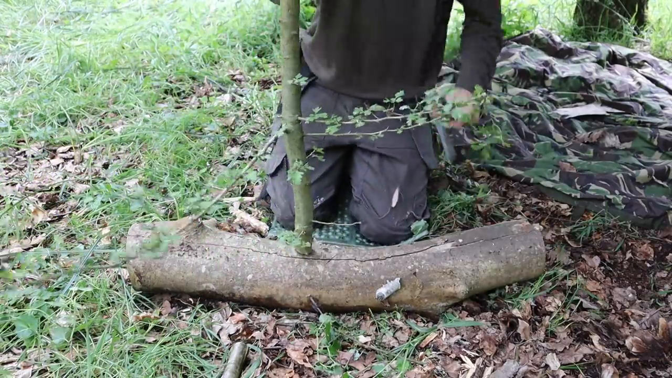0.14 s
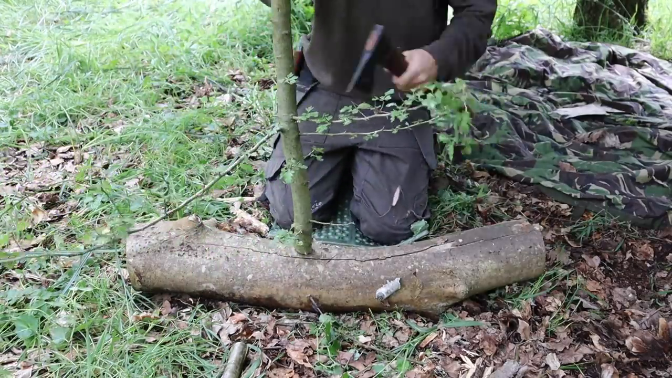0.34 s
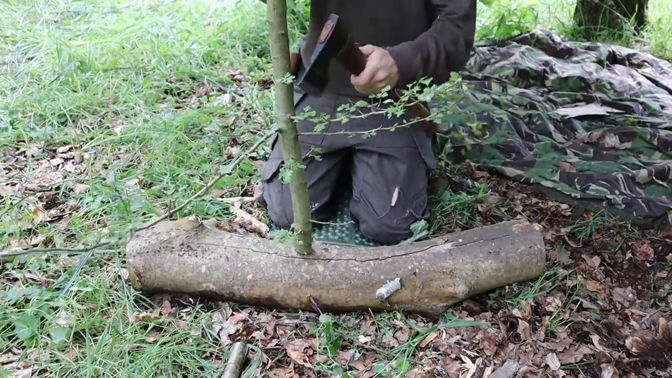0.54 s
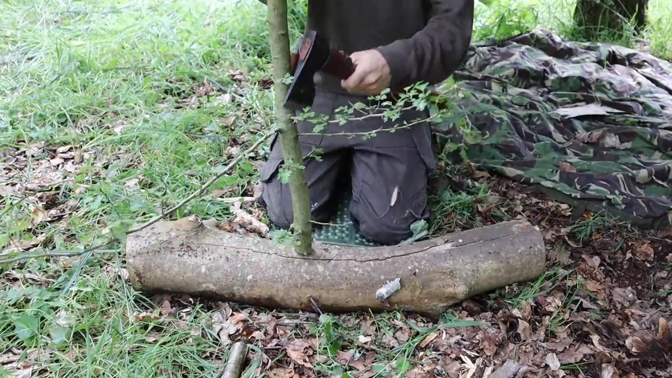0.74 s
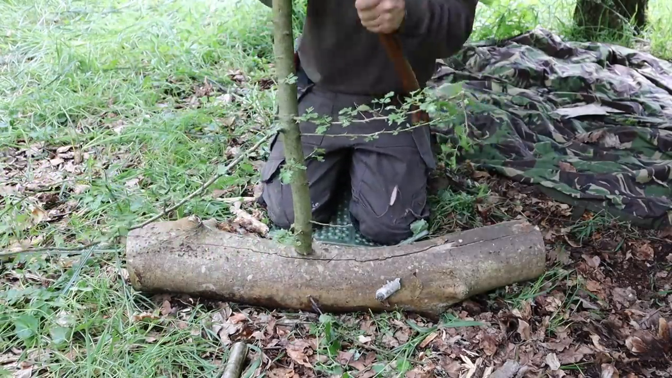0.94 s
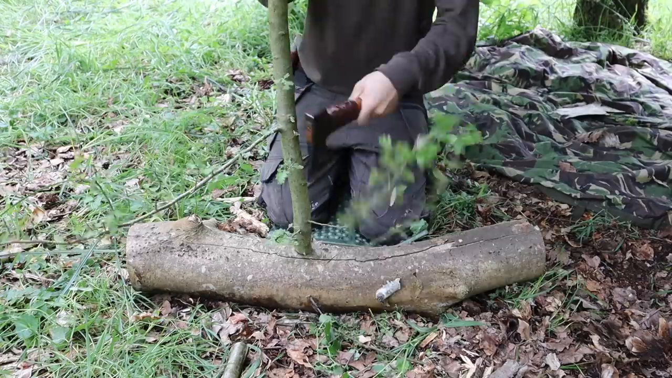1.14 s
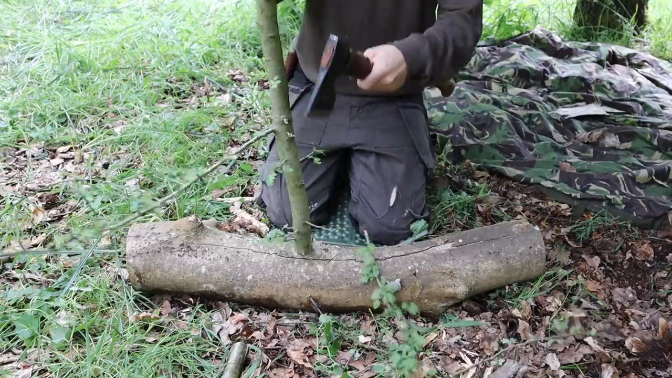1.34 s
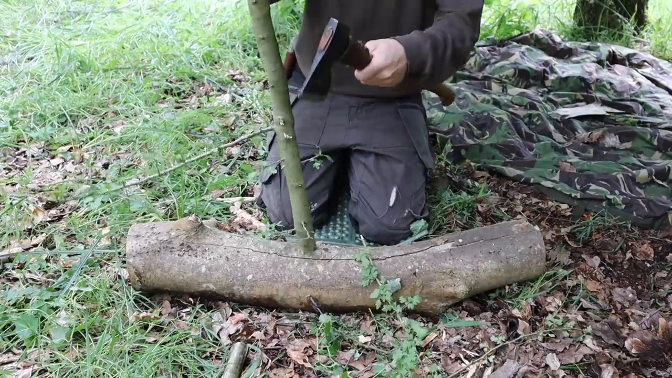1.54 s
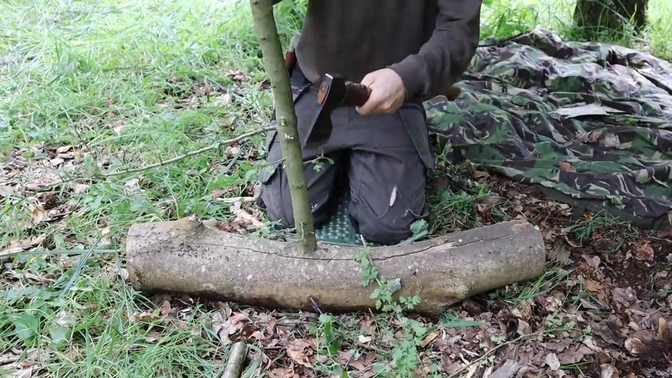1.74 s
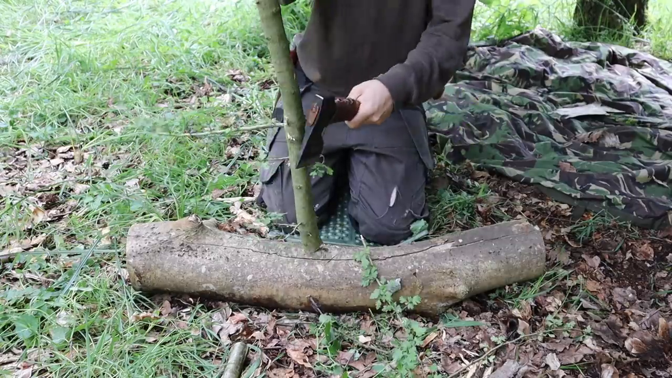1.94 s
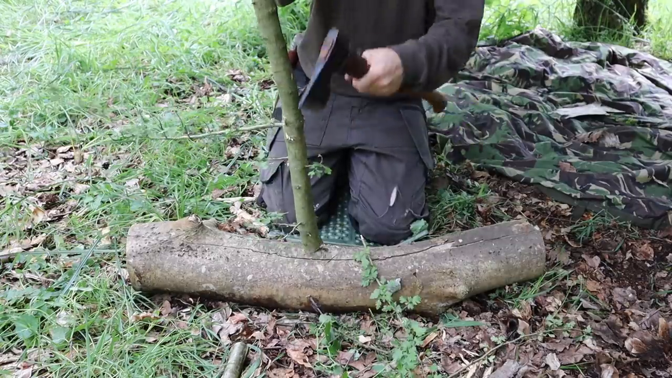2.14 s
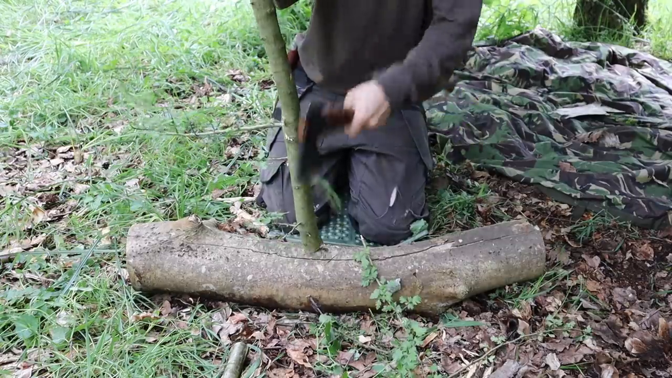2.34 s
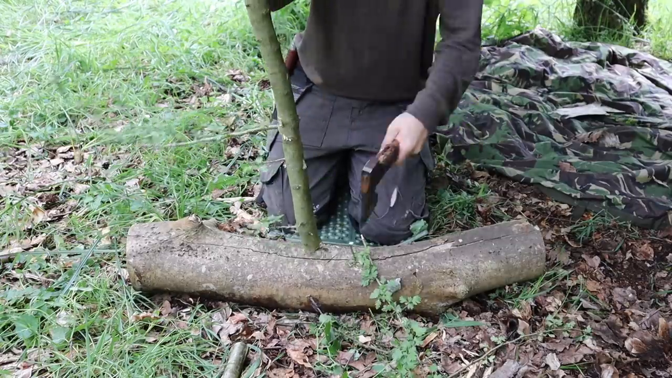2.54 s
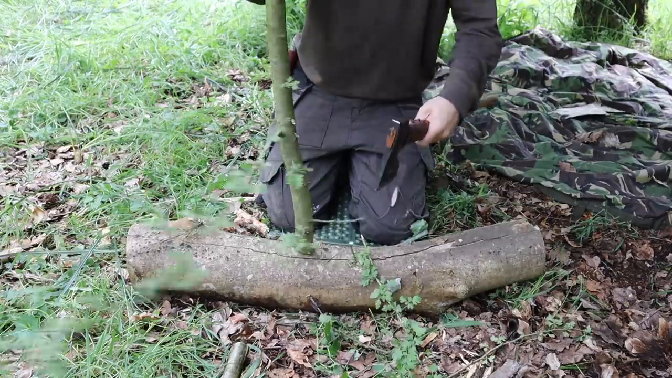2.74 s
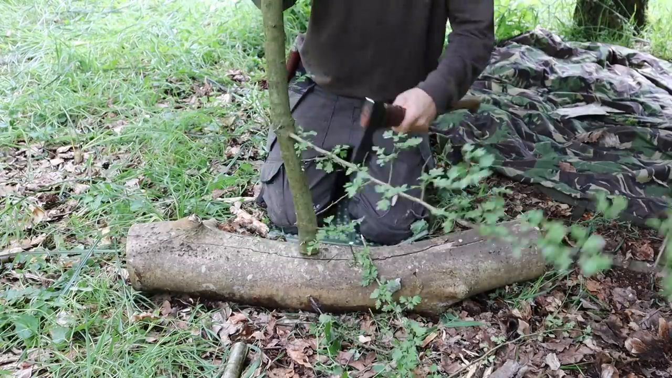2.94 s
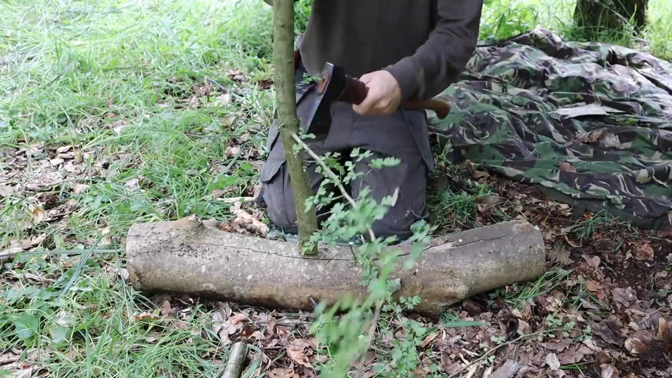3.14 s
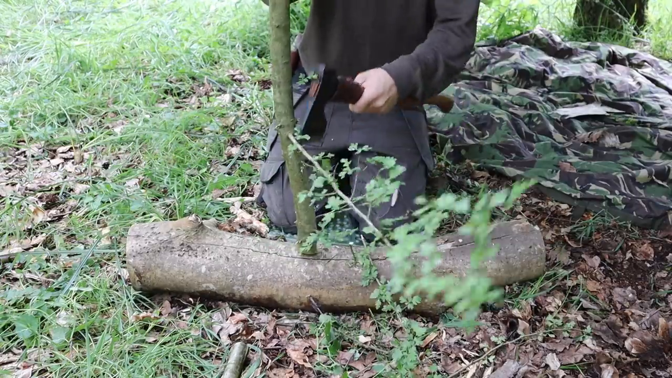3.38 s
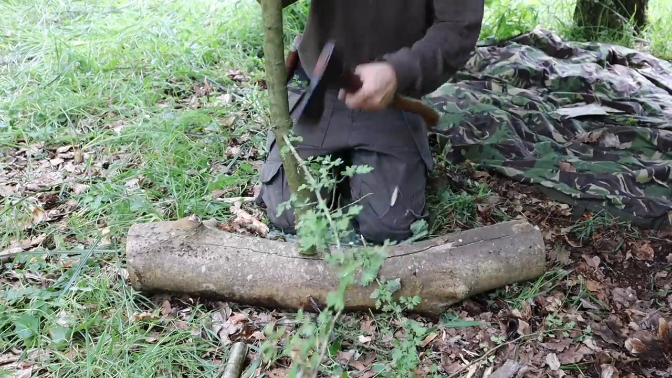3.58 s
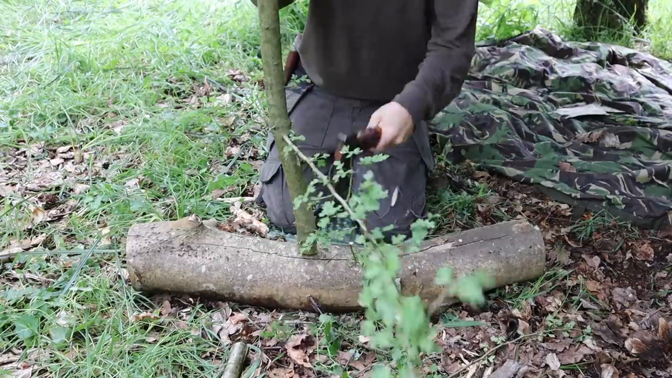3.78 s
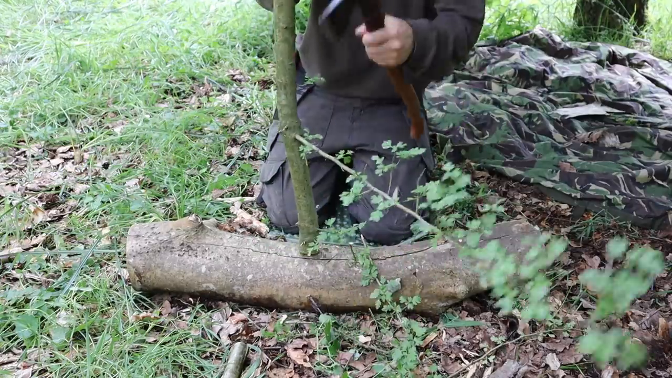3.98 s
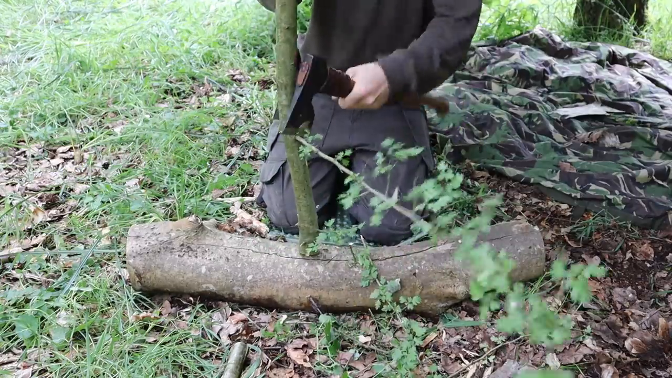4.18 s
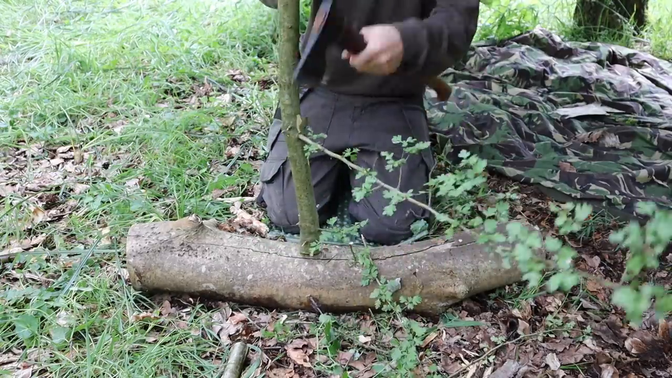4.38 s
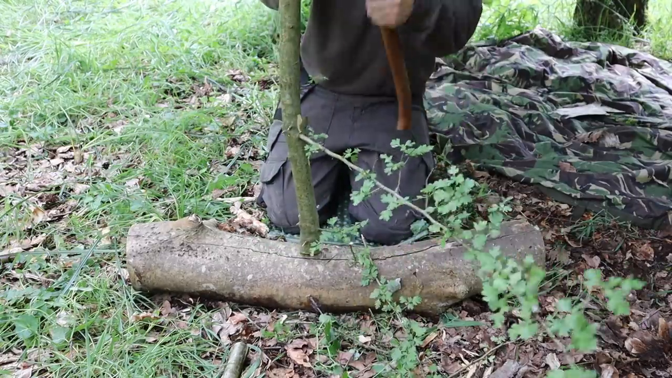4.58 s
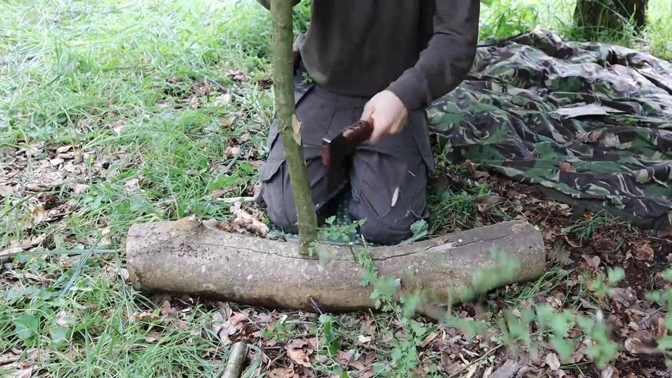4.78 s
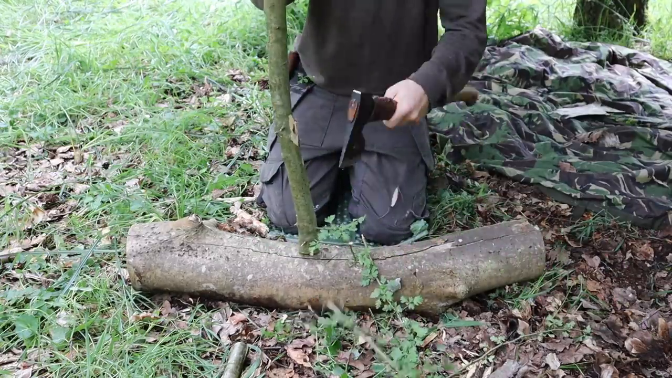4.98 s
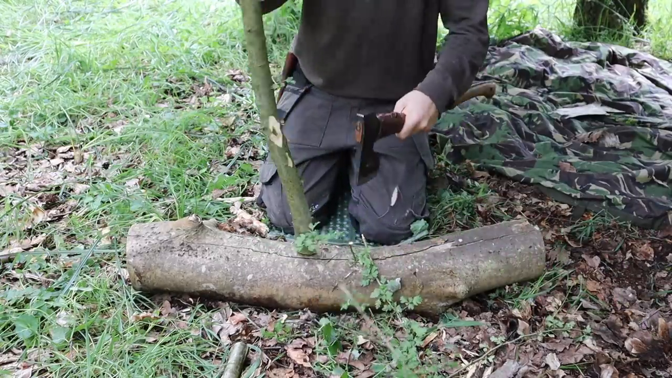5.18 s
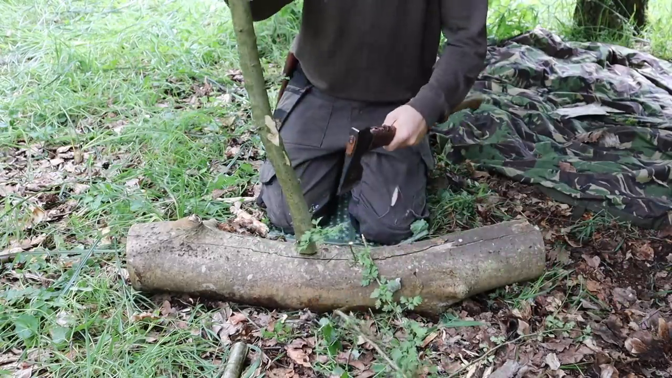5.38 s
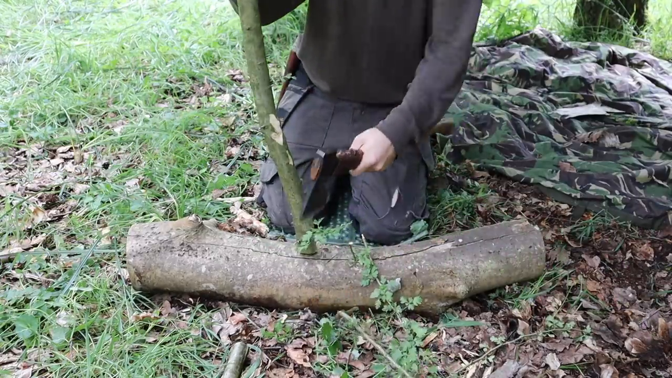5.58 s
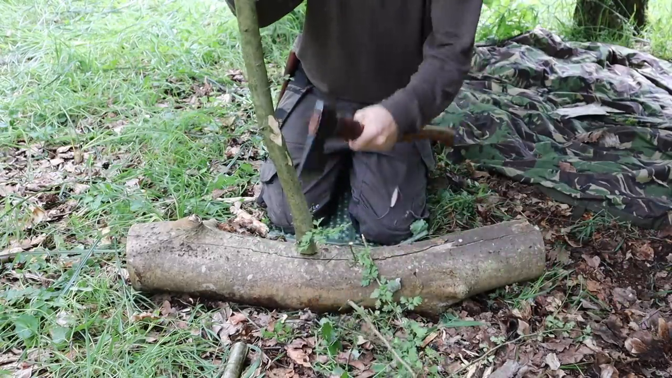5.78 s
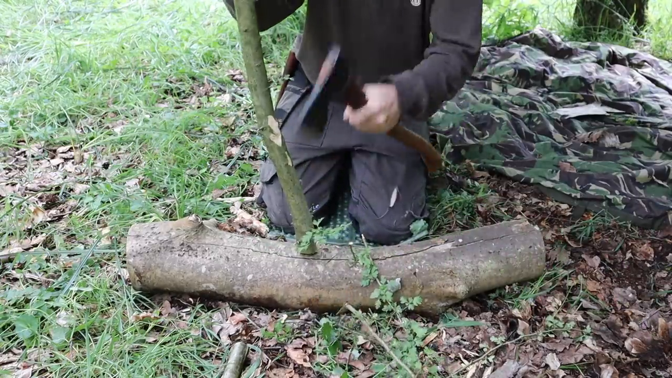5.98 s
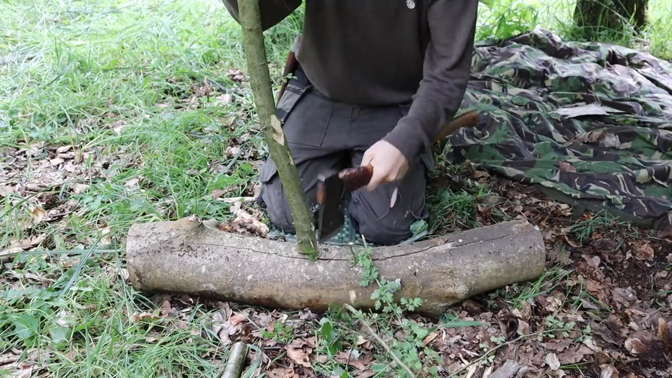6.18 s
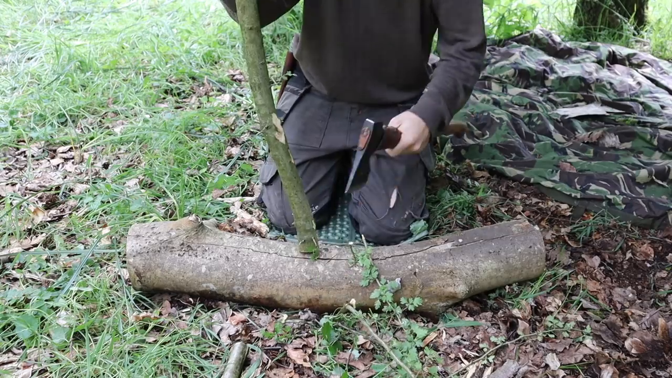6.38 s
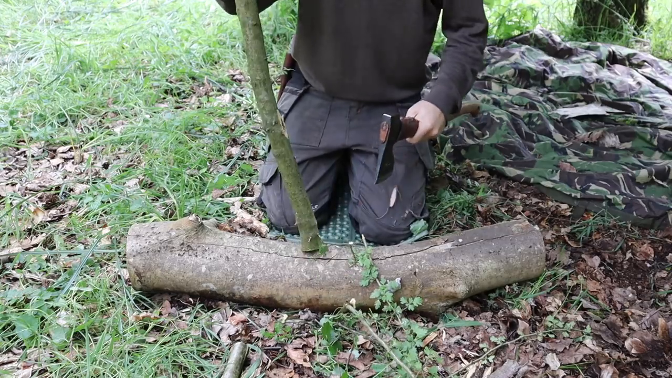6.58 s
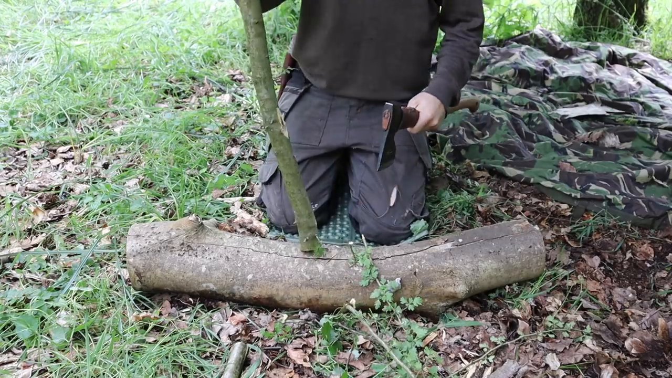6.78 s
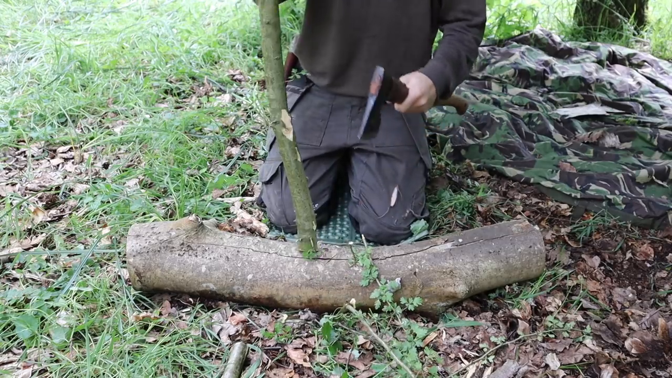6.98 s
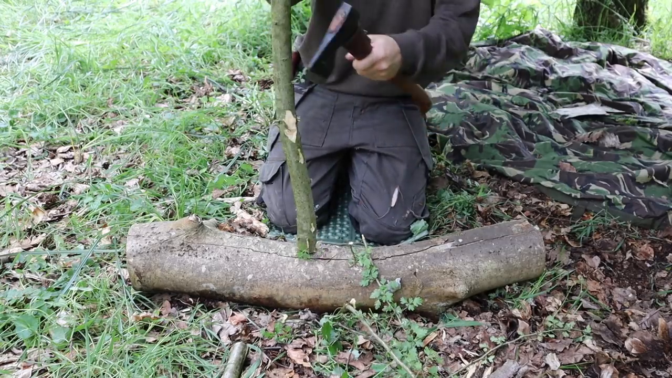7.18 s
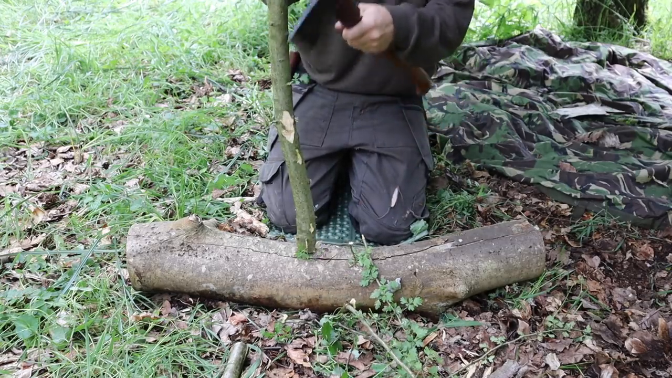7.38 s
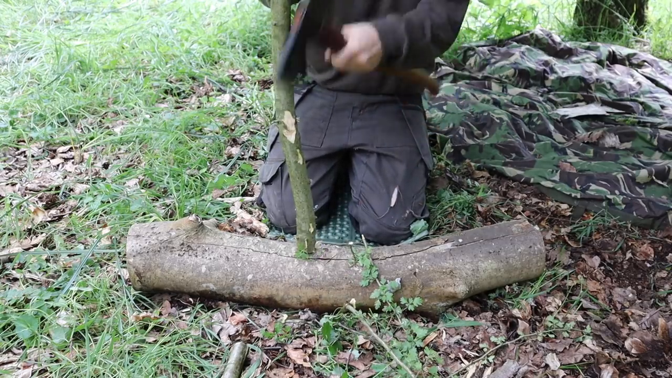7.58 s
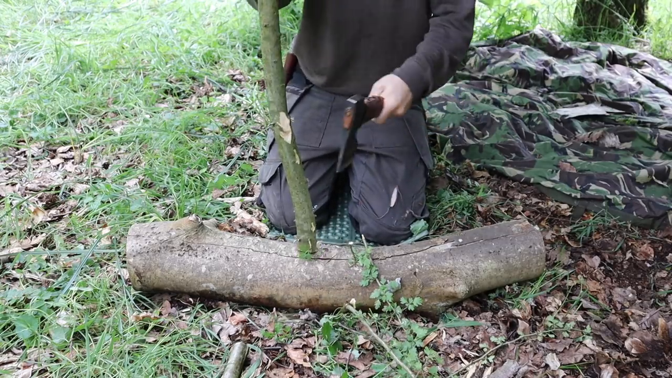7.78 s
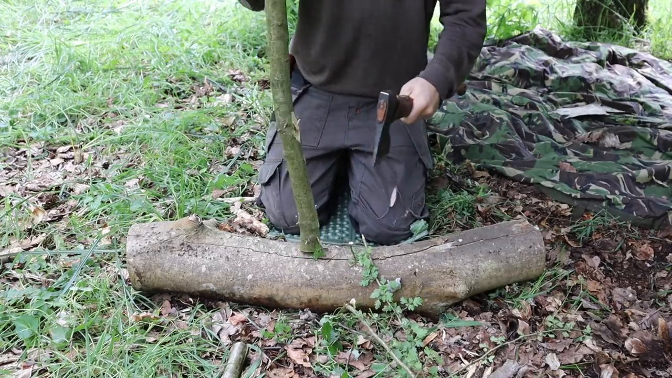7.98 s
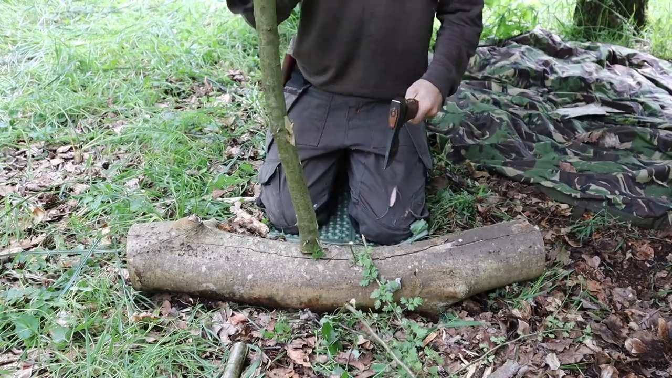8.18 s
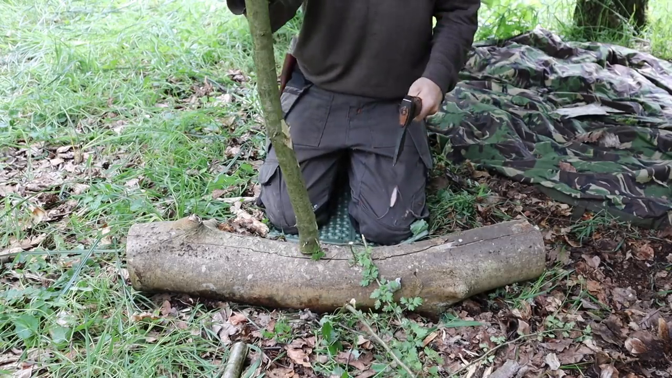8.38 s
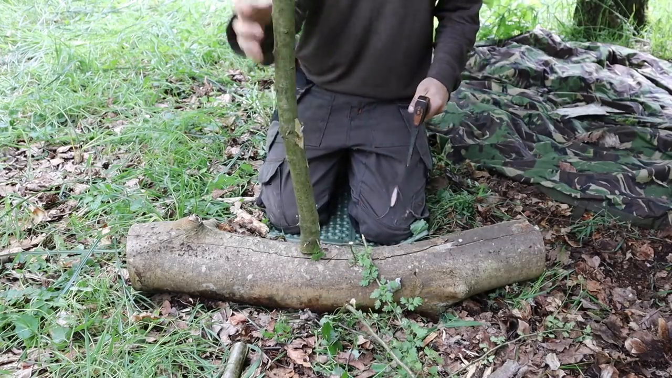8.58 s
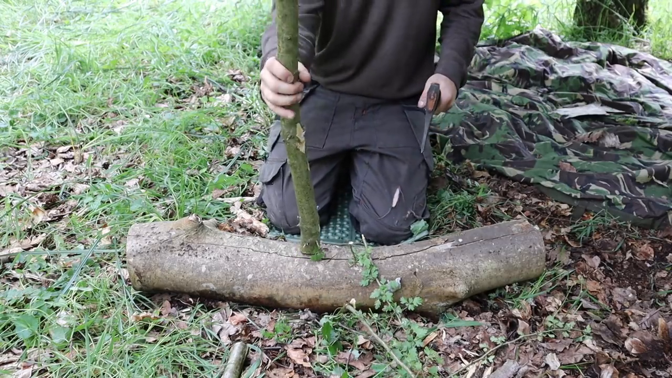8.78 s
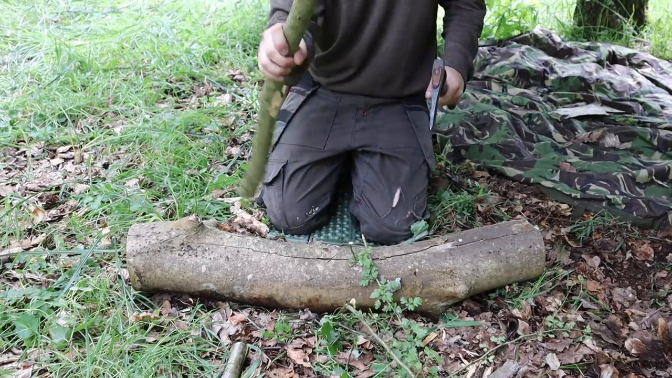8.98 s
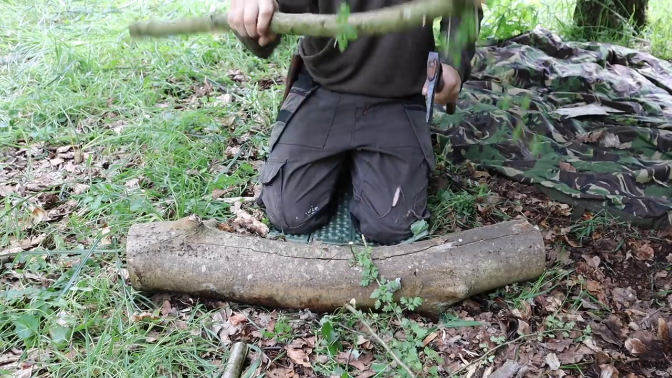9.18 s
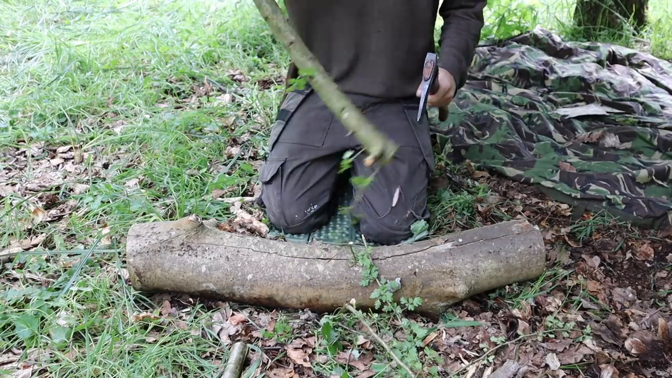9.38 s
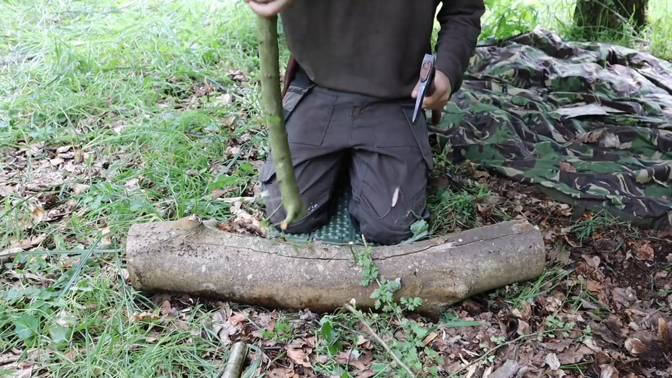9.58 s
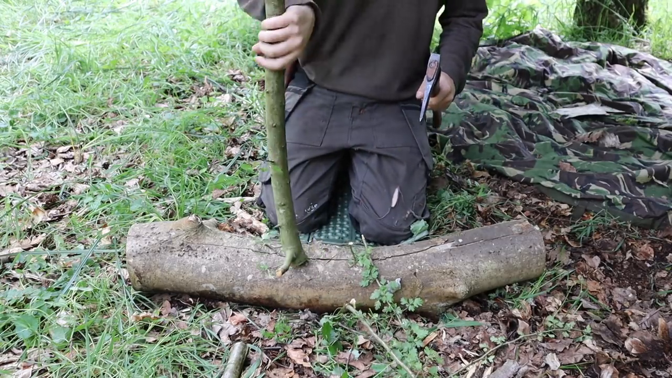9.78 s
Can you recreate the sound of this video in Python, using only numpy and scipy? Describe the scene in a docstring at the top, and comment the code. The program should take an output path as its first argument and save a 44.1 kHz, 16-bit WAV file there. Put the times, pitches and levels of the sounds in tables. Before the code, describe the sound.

A small hatchet scuffs off the ground at the start, close to the microphone in woodland. Two light cuts at 0.7 and 0.9 seconds lead to a hard double crack at 1.1. More chops land on the green stick at about 2.4, 3.3, 3.7, 4.2, 4.7, 6.1 and 7.7 seconds, with faint nicks near 2 and 5.7; the one at 6.1 is the heaviest. Each gives a splintering crack, a woody knock and a brief high steel ping, and several jolt the stick against the log beneath. Between blows, cut twigs tick, swish and rustle, notably around 1.4 and 4.9 seconds. A faint low hum passes near 8 seconds. Small ticks follow, and one sharp woody tap comes at 9.7. Throughout, gusty wind rumbles on the microphone, easing toward the end, over the steady soft hush of trees.

```python
"""A small hatchet scuffs off the ground in a wood, then lops twigs off a green stick standing on a log.
From 0.7 s, each blow knocks the stick, cracks its fibres and rings the steel head. Some jolt the stick
on the log, and cut twigs tick and rustle as they fall. A faint hum passes near 8 s, after the last blow,
and one last sharp woody tap sounds near the end. All along, wind rumbles on the close microphone over
the steady hush of the trees."""
import sys
import numpy as np
from scipy import signal
from scipy.fft import rfft, irfft, next_fast_len
from scipy.io import wavfile
from scipy.ndimage import uniform_filter1d, map_coordinates

SR = 44100
rng = np.random.default_rng(int(sys.argv[2]) if len(sys.argv) > 2 else 0)


def waveform_to_disk(signal):
    """Save audio, clipped to [-1, 1], as 16-bit WAV at the path in sys.argv[1]."""
    frames = np.transpose(np.atleast_2d(signal))
    scaled = np.clip(frames, -1, 1) * 32767
    samples = np.round(scaled).astype(np.int16)
    wavfile.write(sys.argv[1], SR, samples)


N = 433944

# Each row: bite time in seconds, seconds the edge touches before that, crack level in dB, tearing time
# in seconds, tilt (brightness) in dB per octave, splinter pitch in Hz, knock level in dB, ping level
# in dB, seconds the head rings freely, its lower tones' gain in dB.
BLOWS = [(0.727, 0.013, -19, 0.0014, -3, 5160, -46, -44, .013, -3),
         (.852, 0.0069, -12.5, 0.00098, 2.5, 13200, -52, -31.5, .05, 0),
         (1.1347, 0.00023, -3, .005, 0, 12500, -20, -14.5, 0.0087, 7),
         (1.147, 0.013, -2.5, 0.0049, -0.5, 3150, -49, -14.5, 0.057, -19),
         (1.998, 0.0039, -24, .002, -5, 5100, -50, -41, .02, -7),
         (2.412, 0.0048, 0.5, 0.0022, -1, 1530, -17.5, -21.5, .022, 0),
         (2.519, 0.0091, -24.5, 0.0012, 8.5, 5030, -55, -42, .015, -9),
         (3.3164, .0047, -8, 0.0013, 0.5, 3630, -37, -23.5, .044, 6.5),
         (3.685, 0.0078, 1.5, 0.0014, 3, 3800, -17, -20.5, .027, -12),
         (4.2415, 0.0032, -7.5, 0.013, 2, 5260, -20, -45, .011, -3),
         (4.7368, 0.0056, 3, 0.0045, 2.7, 2900, -29, -23, 0.056, 8),
         (5.702, 0.023, -17, 0.0018, -8.5, 5200, -39.5, -44, .033, -12),
         (6.1207, .0046, 6, 0.0017, -4.5, 5500, -9.5, -16, 0.019, 8),
         (7.6557, 0.0044, -6, 0.0038, 0, 5740, -18.5, -15, .085, -1.5)]
def chops():
    """The edge scores the bark and knocks the stick, then bites in with a louder crack."""
    track, t = np.zeros(N), np.arange(SR // 3) / SR
    for bite, lead, db, tearing, tilt_db, hz, knock_db, *_ in BLOWS:
        touch = bite - lead
        add(track, touch, crack(t, db - 19, lead, tilt_db, hz=3100))
        add(track, touch + 0.000746, knock(t, knock_db, knock_db, knock_db - 10))
        add(track, bite, crack(t, db, tearing, tilt_db, hz))
    return track


def crack(t, db, tearing, tilt_db, hz):
    """A sharp, woody crack from the stick; weaker ones die away more slowly."""
    fade = 0.0098 * amp(-0.31 * db)
    return snap(t, db, tearing, fade, tilt_db, hz, tail_db=-19.5, splinter_db=6)


# The tone of breaking fibres. Each row: frequency in Hz, relative level in dB.
FIBRE_TONE = [(700, -8.5), (1500, -1.5), (2800, 4), (4500, 1), (8000, -4), (12500, -8), (15000, -4.5),
              (16200, -38)]
def snap(t, db, tearing, fade, tilt_db, hz, tail_db, splinter_db):
    """Breaking fibres make rough noise that holds while wood tears, dies fast and rings a splinter."""
    roughness = amp(1.5 * unit(uniform_filter1d(rng.standard_normal(len(t)), size=30)))
    since_torn = np.maximum(t - tearing, 0)
    attack = 1 - np.exp(-t / (0.0001 + 0.079 * tearing))
    decay = amp(-60 * since_torn / fade) + amp(tail_db - 60 * since_torn / 0.11)
    burst = attack * decay * coloured(roughness * rng.standard_normal(len(t)), FIBRE_TONE, tilt_db)
    splinter = lambda f: 1 + amp(splinter_db) * .12j * f * hz / (hz * hz - f * f + .12j * f * hz)
    return amp(db - 9) * filtered(burst, splinter)


# The stick's low, high and middle tones. Each row: pitch in Hz, level in dB, seconds to fade by 60 dB.
THUD_TONES = [(168, 3, 0.0056), (291, -5, 0.029), (413, 0.5, .025)]
CLACK_TONES = [(910, -12, 0.066), (991, 6, 0.02), (1655, -1.5, 0.023), (2150, -0.5, 0.0077)]
STICK_TONES = [(569.5, 12.5, 0.075)]
def knock(t, thud_db, clack_db, stick_db):
    """The struck stick vibrates with a low thud, a high clack and a note in between."""
    thud = amp(thud_db) * ring(THUD_TONES, t, spread_db=1.3)
    clack = amp(clack_db) * ring(CLACK_TONES, t, spread_db=1.5)
    note = amp(stick_db) * ring(STICK_TONES, t, spread_db=0.85)
    return -(thud + clack + note)


# The head's top and lower tones. Each row: pitch in Hz, level in dB, seconds to fade by 60 dB.
TOP_STEEL_TONES = [(8394, 2.5, 0.082)]
LOWER_STEEL_TONES = [(6790, 1.5, 0.027), (2735, -8, 0.081)]
def steel_head():
    """The steel head pings at each blow and is soon damped."""
    track, t = np.zeros(N), np.arange(SR // 5) / SR
    for bite, *_, db, free, lower_db in BLOWS:
        damping = amp(-60 * np.maximum(t - free, 0) / 0.011) + amp(-16)  # a little rings on
        top = ring(TOP_STEEL_TONES, t, spread_db=0.79)
        lower = amp(lower_db) * ring(LOWER_STEEL_TONES, t, spread_db=1.0)
        add(track, bite + 0.001189, amp(db) * damping * (top + lower))
    return track


# Each row: start in seconds, level in dB, seconds before it fades, tilt in dB per octave, pitch in Hz.
CRACKS_AND_TAP = [(2.43, -21.5, .011, 5, 3970), (2.448, -10.5, 0.0026, -3, 2560),
                  (3.323, -11.5, 0.0013, -1, 3660), (6.1245, -8, 0.0053, 0.5, 2930),
                  (6.1365, -2, 0.0033, -4, 3770), (7.682, -17, .0047, 5, 4400),
                  (9.6947, -8, 0.0025, 5, 4630)]
def cracks_and_tap():
    """The wood cracks again just after some blows; the last row is a sharp tap on the stick's end."""
    track, t = np.zeros(N), np.arange(SR // 3) / SR
    for start, *settings in CRACKS_AND_TAP:
        add(track, start, crack(t, *settings))
    return track


# The log's tones. Each row: pitch in Hz, level in dB, seconds to fade by 60 dB.
LOG_TONES = [(517, 4, 0.12), (514, -19, 0.25)]
# Each row: start in seconds, then thud, clack and log levels in dB.
JOLTS = [(1.158, -31, -23, -27.5), (2.412, -24, -11, -20.5), (2.43, -29, -21.5, -40),
         (3.686, -17, -24, -31), (4.2435, -22, -10.5, -12.5), (4.2542, -5.5, -12.5, -14),
         (4.7362, -14.5, -4, -12), (4.943, -44, -31, -50), (5.7, -41, -49, -31.5), (6.133, -10, -11.5, -26),
         (6.1395, -10, -7.5, -4.5), (7.658, -24, -18, -27.5)]
def jolts():
    """The foot of the stick jolts on the log, and both ring."""
    track, t = np.zeros(N), np.arange(SR // 3) / SR
    for start, thud_db, clack_db, log_db in JOLTS:
        stick = knock(t, thud_db, clack_db, clack_db - 23)
        log = amp(log_db) * ring(LOG_TONES, t, spread_db=1.0)
        add(track, start, stick - log)
    return track


# Each row: start in seconds, level in dB, splinter pitch in Hz.
TWIG_TICKS = [(.013, -26, 2330), (0.083, -20, 2850), (.783, -36, 11000), (.797, -38, 11000),
              (.845, -23, 5100), (1.186, -25.5, 4000), (1.207, -15, 2430), (1.236, -16, 5450),
              (1.3874, -25, 8000), (1.411, -17.5, 5100), (1.415, -14.5, 3200), (2.456, -18.5, 5100),
              (2.539, -34, 12000), (3.746, -15.5, 10400), (3.765, -29, 3200), (3.7698, -30, 2800),
              (3.817, -33, 12500), (3.821, -32, 13000), (4.225, -22, 5230), (4.406, -25, 1590),
              (4.405, -32, 11000), (4.875, -44, 11100), (4.887, -41, 11000), (4.921, -36, 4000),
              (4.942, -9, 7150), (4.958, -34, 4470), (5.097, -33, 7000), (5.693, -27, 14500),
              (6.1946, -30, 4530), (6.198, -45, 12000), (7.826, -29.5, 7940), (7.84, -33, 6500),
              (7.893, -32.5, 10000), (8.455, -30, 5470), (9.474, -33, 4000), (9.535, -32, 6000),
              (9.546, -29, 5700), (9.624, -31, 11300), (9.818, -23, 5300), (9.827, -31, 6000)]
def twig_ticks():
    """Twigs and chips snap and land with tiny clicks."""
    track, t = np.zeros(N), np.arange(SR // 10) / SR
    for start, db, hz in TWIG_TICKS:
        tilt_db = -3 + 2 * np.log2(hz / 4000)  # thinner, higher splinters sound brighter
        add(track, start, snap(t, db, 0.0014, 0.0073, tilt_db, hz, tail_db=-13, splinter_db=10))
    return track


# Each row: time of the peak in seconds, level in dB, rise time in seconds.
TWIG_SWEEPS = [(.31, -48.5, .035), (1.25, -51, 0.042), (1.42, -32.5, 0.029), (2.8, -55, 0.069),
               (2.92, -53, 0.037), (3.5, -54.5, 0.054), (3.72, -49, .021), (4.33, -48, .1),
               (5.1, -44.5, 0.076), (5.48, -47.5, 0.061), (6.24, -53, .055)]
TWIG_SLAPS = [(2.555, -45, 0.0066), (3.781, -33, .0055), (4.223, -31, .0027), (4.944, -27.5, 0.012)]
GROUND_SCUFF = [(.083, -29, 0.0084), (.2, -38, 0.15)]
def brushing():
    """Leafy twigs sweep past and slap down; the hatchet drags off the ground with a duller scuff."""
    sweeps = swishes(TWIG_SWEEPS, fall_ratio=0.83, tilt_db=5.5)
    slaps = swishes(TWIG_SLAPS, fall_ratio=2.9, tilt_db=5.5)
    scuff = swishes(GROUND_SCUFF, fall_ratio=0.58, tilt_db=-10.5)
    return sweeps + slaps + scuff


# The tone of leaves. Each row: frequency in Hz, relative level in dB.
LEAF_TONE = [(800, -24.5), (3000, 5.5), (5500, 9), (9000, -4), (13000, -2), (16500, -16)]
def swishes(rows, fall_ratio, tilt_db):
    """Brushed leaves crackle in bursts that swell and fade."""
    track, t = np.zeros(N), np.arange(N) / SR
    leaves = crackle(click_gain=0.91) * amp(wobble(120))
    for peak, db, rise in rows:
        fall = fall_ratio * rise
        near = slice(max(round((peak - 3 * rise) * SR), 0), round((peak + 3 * fall) * SR))
        width = np.where(t[near] < peak, rise, fall)
        swell = np.exp(-((t[near] - peak) / width) ** 2)
        track[near] += amp(db) * swell * coloured(leaves[near], LEAF_TONE, tilt_db)
    return track


# Each row: time in seconds, rustle level in dB.
RUSTLE_LEVELS = [(0.0, -46), (0.41, -58.5), (1.18, -59), (1.34, -51.5), (1.75, -57), (2.33, -63),
                 (2.55, -54), (4.77, -64.5), (4.96, -48.5), (6.0, -63.5), (9.56, -63), (9.84, -51)]
def rustle():
    """Leaves brush together in a quiet, fluttering rustle."""
    flutter_db = 0.83 * wobble(25) + 3.94 * wobble(90)
    return amp(curves(RUSTLE_LEVELS)[0] + flutter_db) * coloured(crackle(click_gain=0.95), LEAF_TONE)


def crackle(click_gain):
    """Hiss with about 500 leaf clicks a second, uneven in size."""
    clicks = (rng.random(N) < 500 / SR) * amp(3.6 * rng.standard_normal(N))
    clicks *= np.sign(rng.standard_normal(N))
    return rng.standard_normal(N) + click_gain * unit(clicks)


def echo(sound):
    """The ground and the trees around give a short, dull answer."""
    t = np.arange(SR // 3) / SR
    tone = [(300, -1), (2800, -22.5), (6000, -7.5), (14000, -15)]  # Hz, dB
    tail = coloured(rng.standard_normal(len(t)), tone) * amp(-60 * t / 0.23)
    return signal.fftconvolve(sound, tail / np.linalg.norm(tail))[:N]


# Each row: time in seconds, deep rumble level in dB, upper rumble level in dB.
WIND_LEVELS = [(0.0, -34, -33), (0.27, -29.5, -36.5), (0.85, -24.5, -37), (1.23, -30.5, -47),
               (1.81, -23.5, -39), (2.46, -35, -40.5), (2.77, -23, -33), (3.4, -36.5, -53.5),
               (3.86, -30.5, -43), (4.36, -42, -57), (4.57, -29.5, -43), (4.68, -20, -32.5),
               (4.79, -30, -34.5), (5.42, -28, -36.5), (5.86, -24.5, -36), (6.05, -25.5, -28.5),
               (6.19, -34.5, -38), (6.52, -34, -52), (7.01, -31.5, -43.5), (7.64, -35.5, -54),
               (7.81, -40, -53.5), (8.3, -42, -56), (8.74, -41, -58), (9.43, -43.5, -55), (9.84, -38, -56)]
# The tones of the two rumbles. Each row: frequency in Hz, relative level in dB.
DEEP_TONE = [(8.8, -52), (15, -4.5), (54, 2), (85, -8.5), (120, -15.5), (200, -120)]
UPPER_TONE = [(35, -40), (60, -10), (92, -1.5), (142, -6), (260, -31.5), (340, -63), (570, -120)]
def wind():
    """Gusts buffet the microphone with a lumpy rumble."""
    deep_db, upper_db = curves(WIND_LEVELS)
    gust = wobble(9)
    deep = amp(deep_db + 3 * gust) * coloured(rng.standard_normal(N), DEEP_TONE)
    upper = amp(upper_db + 2.1 * gust + 3 * wobble(23)) * coloured(rng.standard_normal(N), UPPER_TONE)
    return deep + upper


# The tone of the trees. Each row: frequency in Hz, relative level in dB.
TREE_TONE = [(120, -11), (200, -9.5), (334, -6.5), (569, -5.5), (867, -1), (1000, -5.5), (1370, -9.5),
             (2210, -8), (3690, -8), (4680, -19), (7970, -28.5), (13100, -33), (16000, -33)]
def trees():
    """Far trees make a smooth hush whose level sways a little."""
    return amp(-42 + 0.7 * wobble(1.826)) * coloured(rng.standard_normal(N), TREE_TONE)


# Each row: time in seconds, level in dB, pitch in Hz.
PASSING_HUM = [(7.74, -80, 363), (7.8, -50.5, 359), (8.03, -53, 359), (8.12, -70, 359.3)]
def hum():
    """A faint, wavering tone swells briefly, with a weaker one an octave below."""
    db, hz = curves(PASSING_HUM)
    phase = 2 * np.pi * np.cumsum(hz + 1.09 * wobble(13)) / SR
    return amp(db) * (np.sin(phase) + 0.49 * np.sin(phase / 2))


def ring(tones, t, spread_db):
    """A struck object's fading tones, each a little louder or softer on every strike."""
    attack = 1 - np.exp(-t / 0.00073)
    return attack * sum(amp(db + spread_db * rng.standard_normal() - 60 * t / fade)
                        * np.sin(2 * np.pi * hz * t) for hz, db, fade in tones)


def amp(db):
    """Turns decibels into a gain."""
    return 10 ** (np.asarray(db) / 20)


def unit(x):
    """Scales x to an average power of 1."""
    return x / np.sqrt(np.mean(x ** 2) + 1e-20)


def curves(rows):
    """One value per sample for each column after the time."""
    times, *columns = np.transpose(rows)
    return [np.interp(np.arange(N) / SR, times, column) for column in columns]


def wobble(rate):
    """A smooth curve through `rate` random points a second."""
    return map_coordinates(rng.standard_normal(int(N * rate / SR) + 4), [np.arange(N) * rate / SR])


def filtered(x, response):
    """Scales each frequency in x by response(frequency)."""
    size = next_fast_len(len(x) + 8192)
    return irfft(rfft(x, size) * response(np.fft.rfftfreq(size, 1 / SR)), size)[:len(x)]


def coloured(x, tone, tilt_db=0):
    """Gives x a tone, tilted by tilt_db per octave around 4 kHz, at an average power of 1."""
    points_hz, points_db = np.transpose(tone)
    def response(hz):
        db = np.interp(np.log(hz + 1), np.log(points_hz + 1), points_db)
        return amp(db + tilt_db * np.log2((hz + 200) / 4000))
    return unit(filtered(x, response))


def add(track, start, sound):
    """Lays a sound on the track at `start` seconds."""
    part = track[round(start * SR):][:len(sound)]
    part += sound[:len(part)]


def scene():
    """Mixes every source into one channel; only the struck wood echoes."""
    wood = chops() + cracks_and_tap() + jolts()
    chopping = wood + amp(-21) * echo(wood) + steel_head()
    twigs = twig_ticks() + brushing() + rustle()
    return (chopping + twigs + wind() + trees() + hum())[None]


def record(dry):
    """The loudest blows clip softly, and everything above 15900 Hz is cut."""
    clipped = dry[0] / (1 + np.abs(dry[0]) ** 8) ** (1 / 8)
    return filtered(clipped, lambda hz: hz < 15900)[None]


dry = scene()
out = record(dry)
waveform_to_disk(out)
```